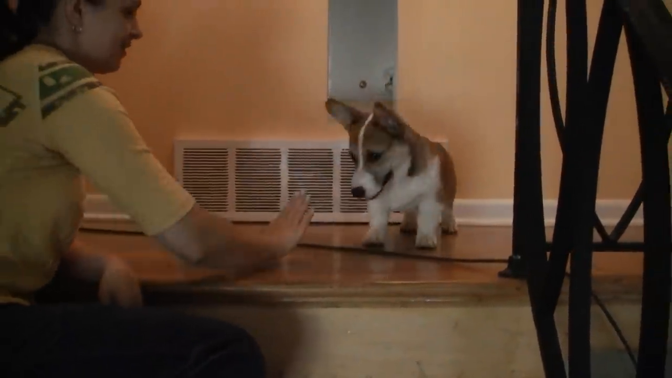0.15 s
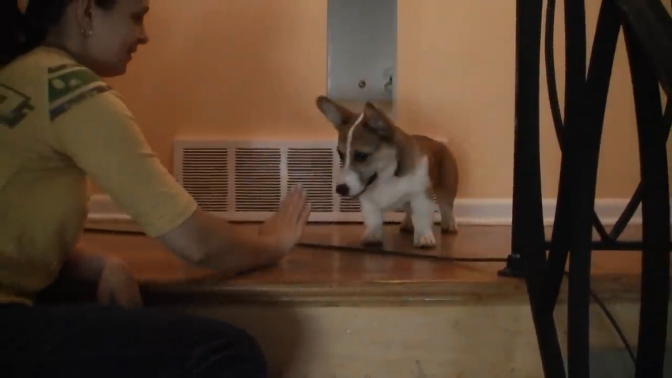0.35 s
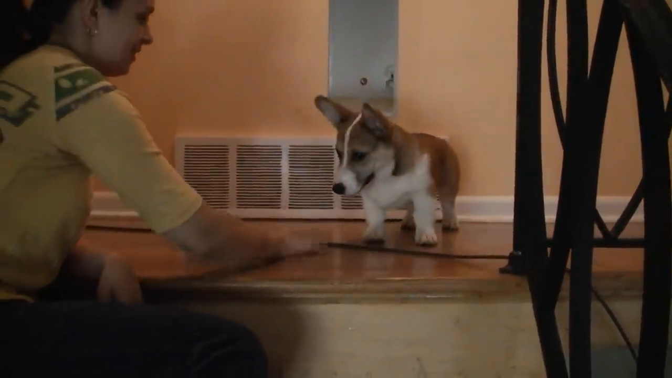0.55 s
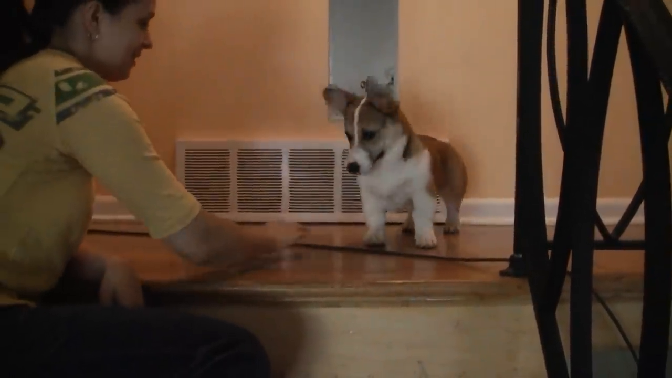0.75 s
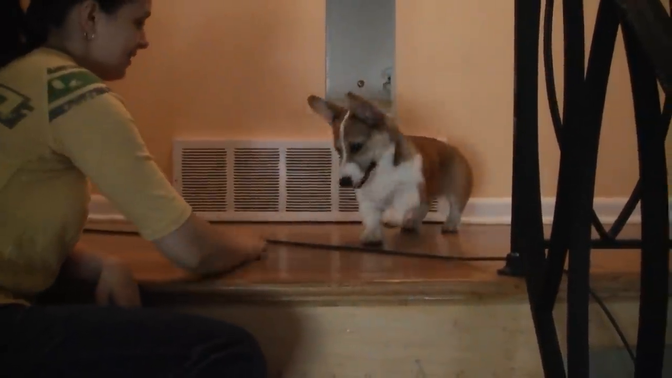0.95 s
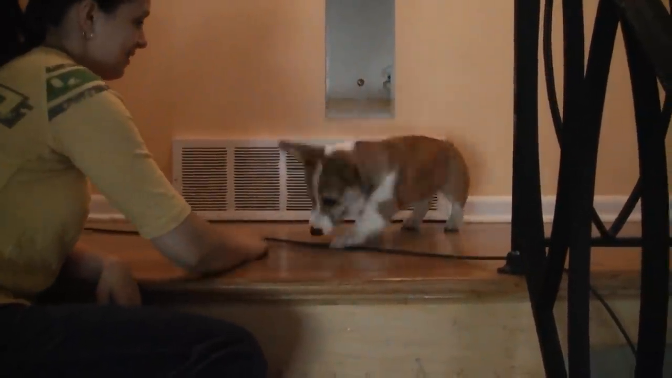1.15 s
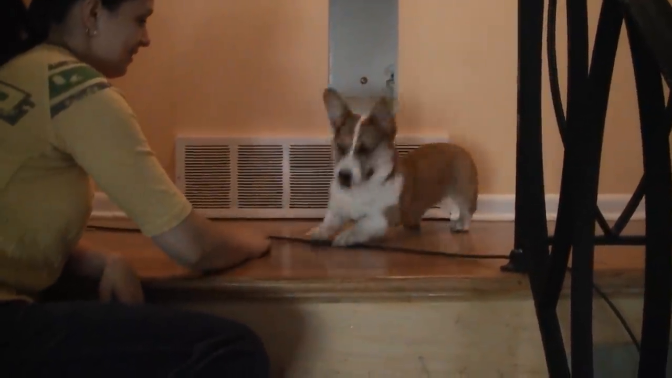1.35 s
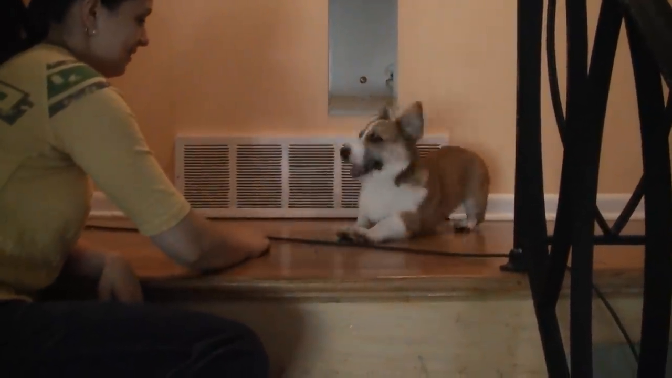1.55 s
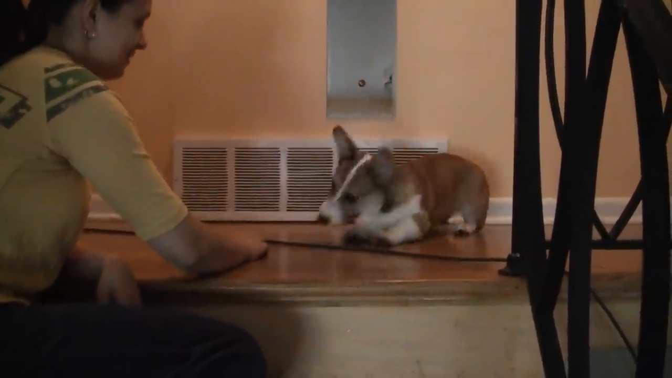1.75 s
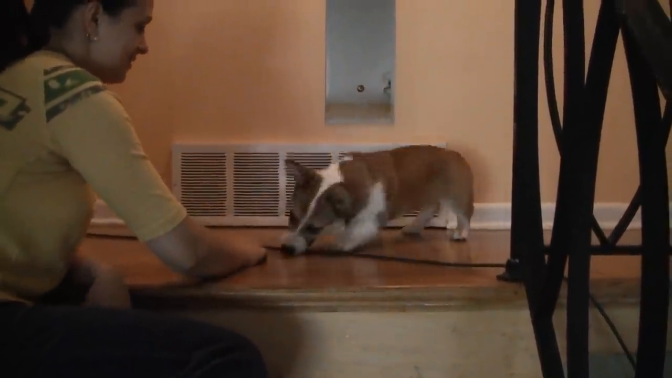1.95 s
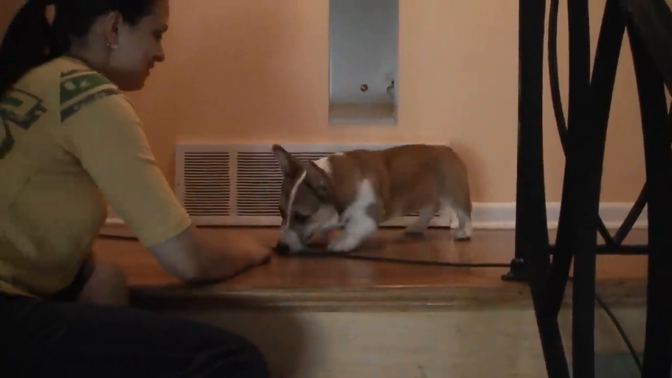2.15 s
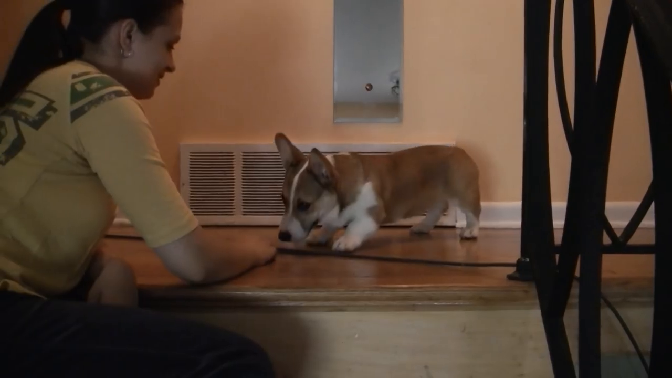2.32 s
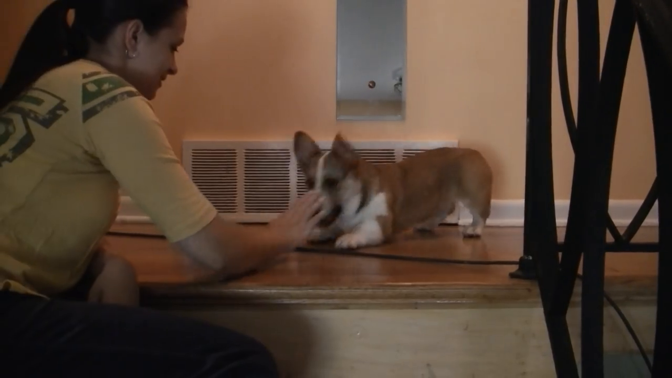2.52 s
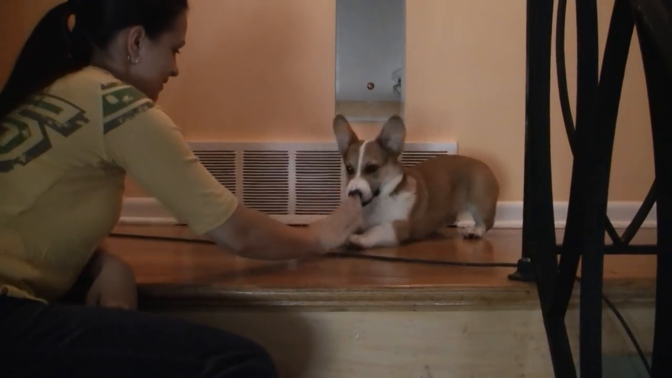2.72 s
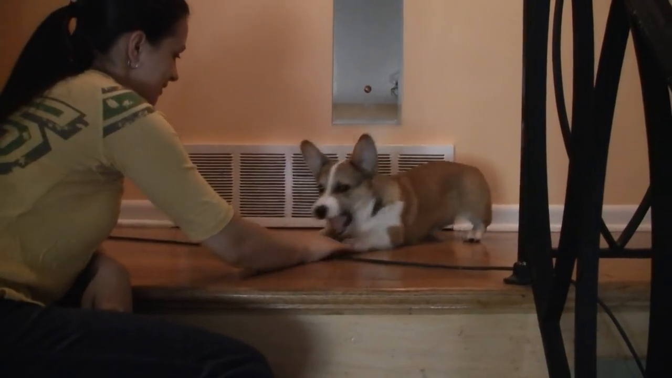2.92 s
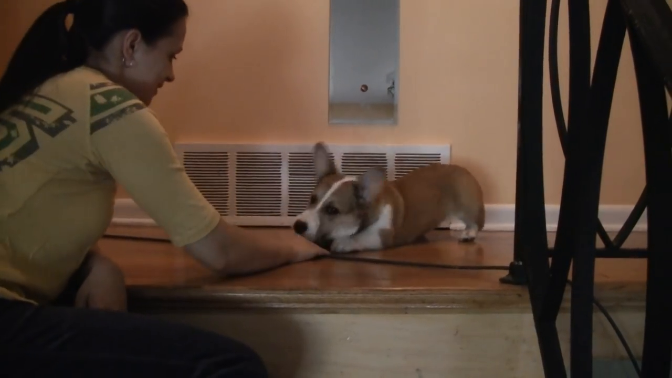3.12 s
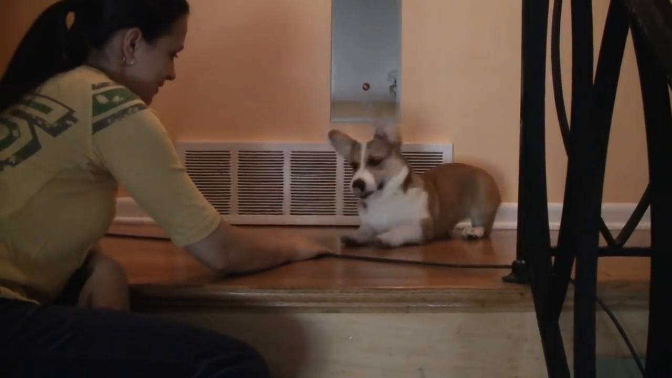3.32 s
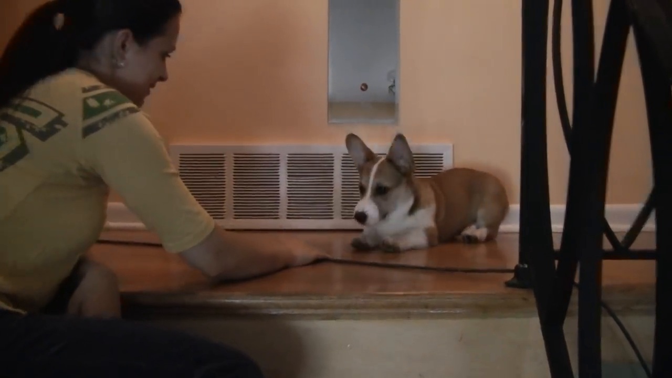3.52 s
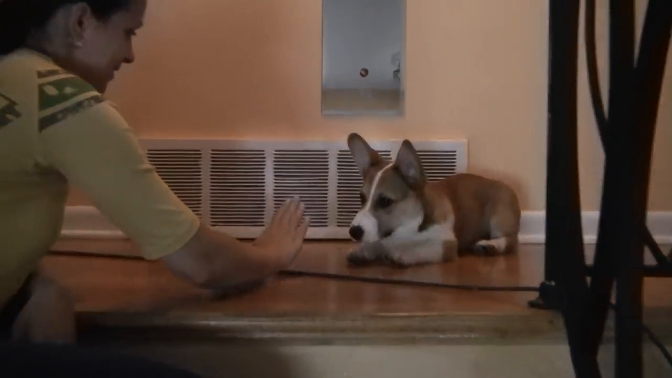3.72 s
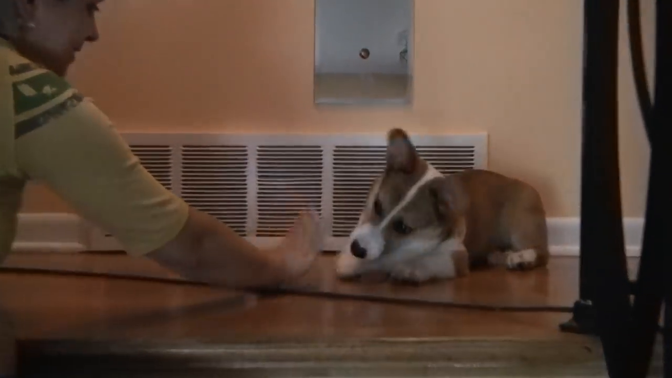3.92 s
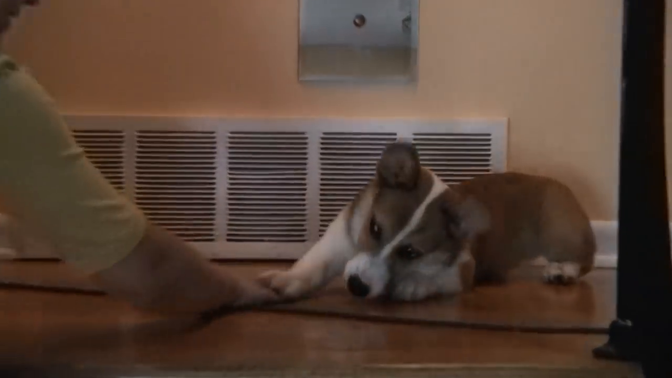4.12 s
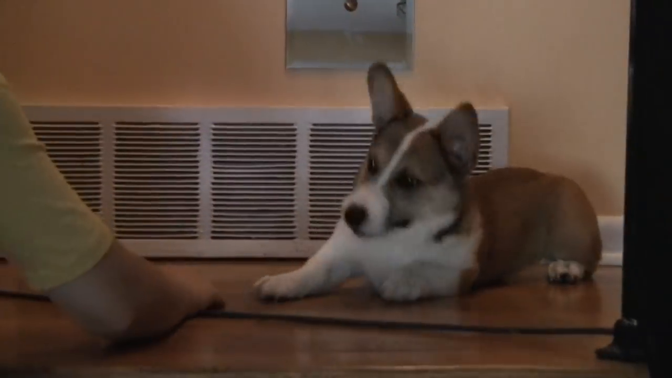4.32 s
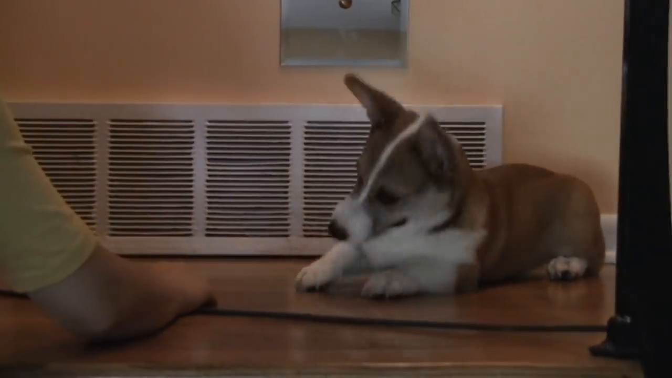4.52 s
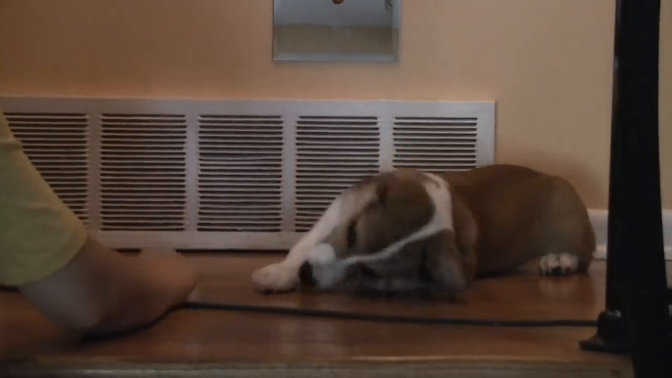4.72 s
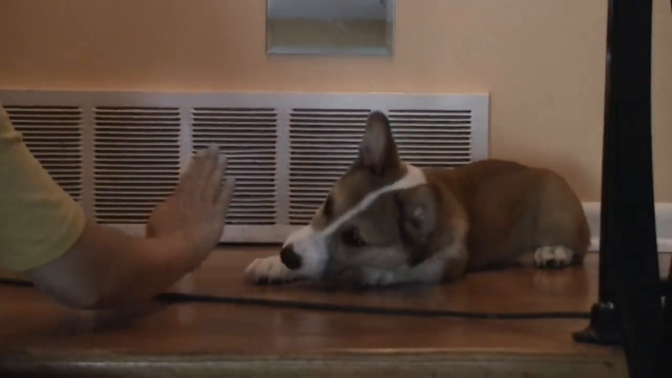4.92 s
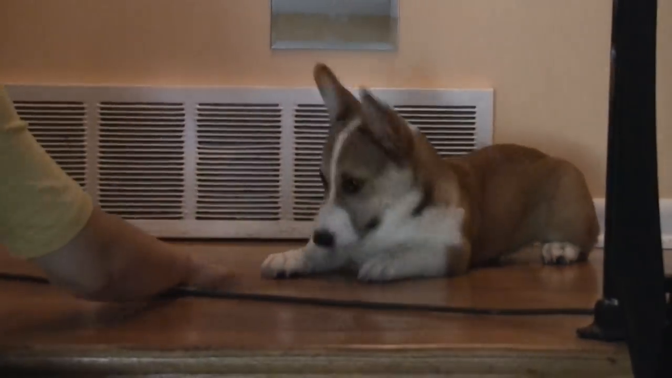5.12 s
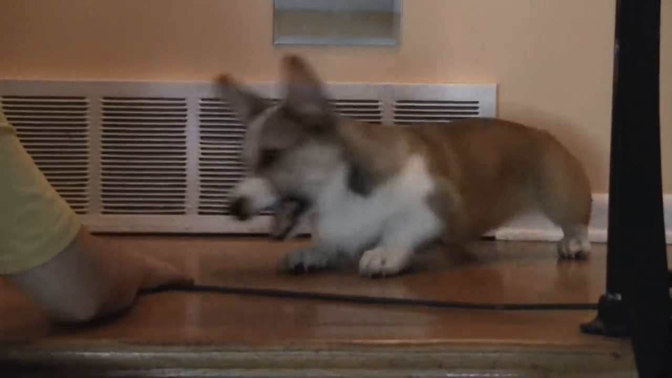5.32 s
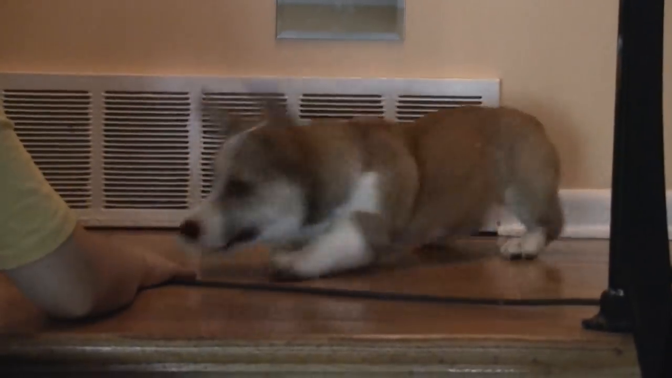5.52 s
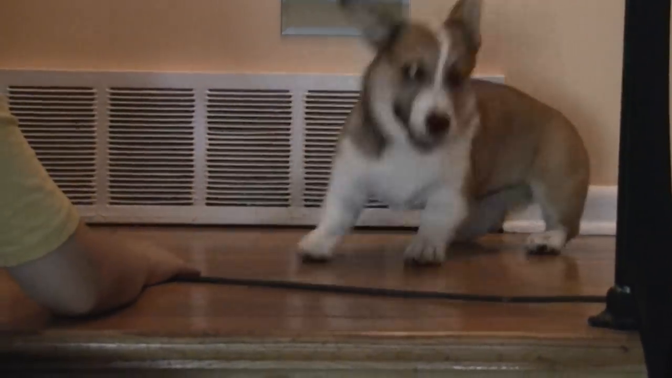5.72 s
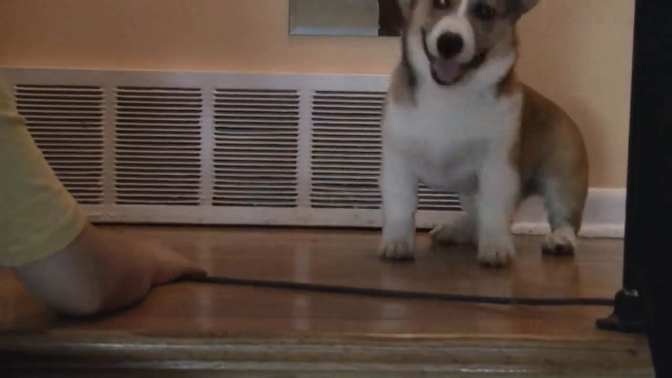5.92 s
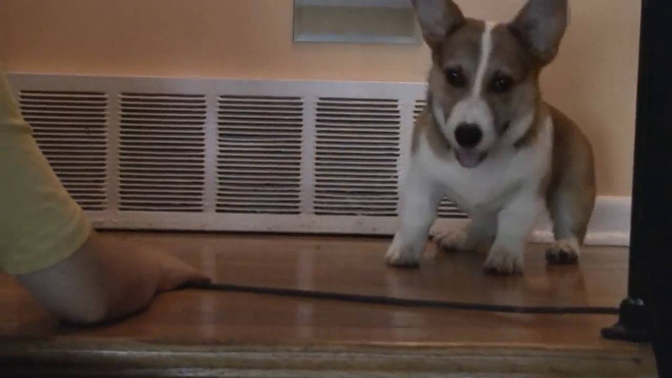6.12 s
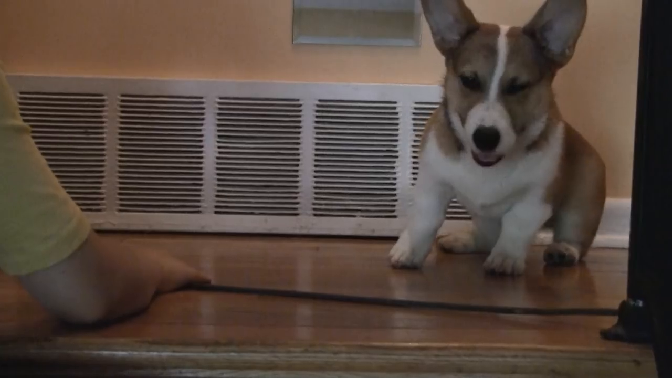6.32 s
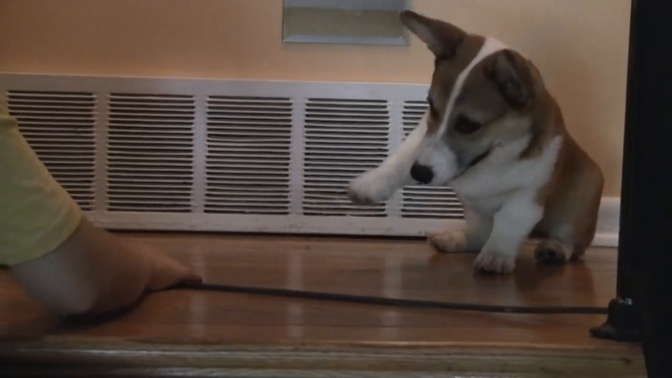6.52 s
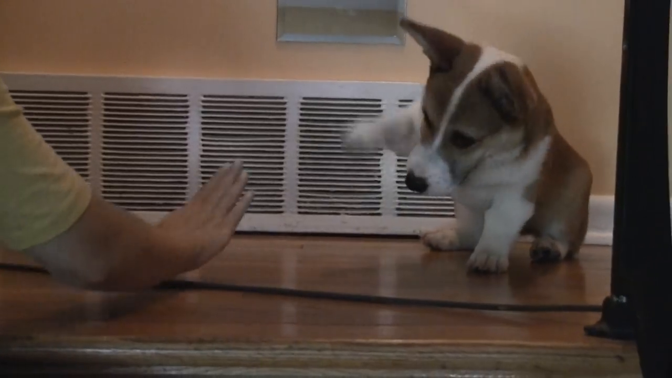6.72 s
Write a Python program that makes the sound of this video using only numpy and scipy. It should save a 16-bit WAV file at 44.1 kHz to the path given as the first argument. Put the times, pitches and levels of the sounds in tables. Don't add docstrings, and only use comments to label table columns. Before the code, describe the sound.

Faint vent drone and hiss in a live indoor stairwell, stereo microphones some metres off. A palm pats hollow boards, then a puppy pounces with clustered thuds, fur and pads sliding, claws clicking and a short rubbery skid. It snorts softly between moves. Further slaps come singly, one sharp and hard, the others duller, and a final scrabble with booming paws and a strong huff gives way to small ticks.

```python
import sys
import numpy as np
from scipy import signal
from scipy.fft import rfft, irfft, next_fast_len
from scipy.io import wavfile
from scipy.ndimage import uniform_filter1d

SR = 44100
rng = np.random.default_rng(int(sys.argv[2]) if len(sys.argv) > 2 else 0)


def pcm_store(signal):
    levels = np.round(np.clip(np.atleast_2d(signal), -1, 1) * 32767)
    wavfile.write(sys.argv[1], SR, levels.astype(np.int16).T)


def natural_amplitude(level_db):
    exponent = np.asarray(level_db, float) / 20
    return 10 ** exponent


N = 302526

# start in seconds, smack peak in dB, thud in dB, snap in dB,
# pitch of the air trapped under the palm in Hz.
PALMS = [
    (0.553, -37, 0.5, -9, 770),
    (2.758, -37, 5, -22, 1160),
    (3.948, -31, 6, 2, 1320),
    (4.9948, -34, 1, -30, 1420),
]


def unit(x):
    return x / np.sqrt(np.mean(x ** 2) + 1e-20)


def along(points, hz):
    f, v = np.transpose(points)
    return np.interp(np.log(hz + 1), np.log(f + 1), v)


def filtered(x, response):
    m = next_fast_len(x.shape[-1] + 8192)
    spectrum = rfft(x, m) * response(np.fft.rfftfreq(m, 1 / SR))
    return irfft(spectrum, m)[..., :x.shape[-1]]


def causal(points):
    def response(hz):
        gain = natural_amplitude(along(points, hz))
        cepstrum = irfft(np.log(gain / np.sqrt(np.mean(gain ** 2))))
        half = len(cepstrum) // 2
        cepstrum[1:half] *= 2
        cepstrum[half + 1:] = 0
        return np.exp(rfft(cepstrum))
    return response


def resonant(modes):
    def response(f):
        h = 0
        for k, (hz, width_hz, db) in enumerate(modes):
            damping = 1j * f * width_hz
            h = h + (-1) ** k * natural_amplitude(db) * damping / (hz * hz - f * f + damping)
        return unit(np.abs(h)) * np.exp(1j * np.angle(h))
    return response


def add(track, s, x):
    part = track[..., round(s * SR):][..., :x.shape[-1]]
    part += x[..., :part.shape[-1]]


def push(length_s, grain_db):
    u = np.arange(SR // 4) / SR / np.clip(length_s, .0003, .08)
    grains = rng.standard_normal(len(u)) * natural_amplitude(grain_db * rng.exponential(size=len(u)))
    force = u * np.exp(-u) * grains
    return force / np.linalg.norm(force)


def taps(rows, width):
    out = np.zeros(N)
    for s, db, hz in rows:
        tap = .25 * push(.001, grain_db=1)[:SR // 50]
        tap[0] -= 1
        nail = resonant([(hz, width * hz, 0)])
        add(out, s, natural_amplitude(db + 8.5) * filtered(filtered(tap, nail), nail))
    return out


def sounded(force):
    # pitch in Hz, width in Hz, level in dB.
    boards = [(124.4, 6.6, -8.5), (176.7, 26.2, 1.5), (302, 63, -2), (413, 43.7, 0), (544, 51, -11.5),
              (670, 17, -44), (830, 33, -11)]
    # frequency in Hz, level in dB.
    crack = [(1500, -14), (2400, 3), (3500, -0.5), (4800, 1.5), (6500, -41)]
    # frequency in Hz, level in dB.
    snap = [(3500, -0.5), (5200, -0.5), (7500, -3), (9000, -7.5), (11000, -15), (15500, -16)]
    bodies = [resonant(boards), causal(crack), causal(snap)]
    return sum(filtered(f, body) for f, body in zip(force, bodies))


def air():
    # frequency in Hz, density in dB per Hz.
    density = [(20, -22), (60, -18), (102, -3.5), (137, -10.5), (200, -3), (260, -4.5), (420, -2),
               (520, -4), (660, -6), (1000, -11), (1500, -15), (2700, -21), (6000, -26.5), (16000, -32)]
    # frequency in Hz, side under mid in dB.
    side_under_mid = [(60, -4), (110, -11), (200, 0), (380, -0.5), (700, -1), (1290, -0.5), (2380, -1.5),
                      (4400, -1), (8120, -1), (15000, 0)]
    # time in seconds, level in dB.
    level_db = [(0, -65), (1, -65), (3.5, -64), (6, -65), (6.86, -66)]
    z = signal.stft(rng.standard_normal((2, N)), nperseg=512)[2]
    field = uniform_filter1d(rng.standard_normal(z.shape[1:]), size=5, axis=0)
    field = uniform_filter1d(field, size=14, axis=1)
    pair = signal.istft(z * natural_amplitude(1 * unit(field)), nperseg=512)[1][:, :N]
    mid, side = filtered(pair, lambda hz: natural_amplitude(along(density, hz) + [0 * hz, along(side_under_mid, hz)]))
    level = natural_amplitude(np.interp(np.arange(N) / SR, *np.transpose(level_db)))
    return level * np.array([mid + side, mid - side]) / np.std(mid)


def stairwell(x, build_s):
    # frequency in Hz, t60 in seconds.
    decay = [(100, 0.22), (300, 0.56), (1000, 0.6), (2500, 0.58), (6000, 0.6), (12000, 0.34)]
    # frequency in Hz, side under mid in dB.
    side_under_mid = [(60, -38), (110, -15), (200, -25.5), (380, -13), (700, -13.5), (1290, -13.5),
                      (2380, -9), (4400, -3.5), (8120, -1), (15000, 7)]
    out, hop = np.zeros((2, N)), SR // 6
    window = np.hanning(2 * hop + 1)[:-1]
    padded = np.pad(x, (hop, 2 * hop))
    for start in range(0, N, hop):
        hz, t, z = signal.stft(rng.standard_normal((2, SR * 2 // 3)), SR, nperseg=256)
        z = z * natural_amplitude(-60 * t / along(decay, hz)[:, None])
        z = z * natural_amplitude([0 * hz, along(side_under_mid, hz)])[..., None]
        mid, side = signal.istft(z, SR, nperseg=256)[1]
        rise = 1 - np.exp(-np.arange(len(mid)) / SR / build_s)
        tail = rise * np.array([mid + side, mid - side]) / np.linalg.norm(mid)
        piece = window * padded[start:start + 2 * hop]
        wet = signal.fftconvolve(piece[None], tail, axes=1)
        add(out, max(start - hop, 0) / SR, wet[:, max(hop - start, 0):])
    return out


def booms():
    # start in seconds, boom in dB.
    weight = [(1.083, -51.5), (1.137, -67), (1.185, -59), (1.242, -47), (1.3, -53), (1.399, -48),
              (1.9, -58), (1.937, -53.5), (3.057, -54), (4.184, -58), (4.697, -53.5), (5.466, -46),
              (5.518, -65), (5.578, -45.5)]
    palm_boom_db, boom_hz, scatter = -9.5, 117.6, 0.046
    out, t = np.zeros(N), np.arange(SR // 4) / SR
    for s, db in weight + [(s, db + palm_boom_db) for s, db, *_ in PALMS]:
        hz = boom_hz * (1 + scatter * rng.standard_normal())
        envelope = natural_amplitude(db + 11.5 - 60 * t / 0.1) * (1 - np.exp(-t / 0.0028))
        add(out, s, envelope * np.sin(2 * np.pi * hz * t))
    return out


def huffs():
    # start in seconds, peak in dB, snout pitch in Hz, upper bands in dB, flutter from 0 to 1.
    breaths = [(0.072, -58, 1340, -31, 0.2), (.918, -54.5, 1950, -8.5, 0), (1.042, -51, 1730, -22, 0.08),
               (1.155, -46, 1850, 23, 0.5), (1.539, -39.5, 1720, -4, 0.01), (2.006, -42, 1570, -1, 0.2),
               (2.577, -54.5, 1600, -3, 0.3), (3.018, -44, 1200, -10.5, 0.1), (4.359, -49, 1500, -5, 0.11),
               (5.354, -50.5, 1420, 9, 0.1), (5.609, -36, 1900, -5.5, 0.2)]
    plain_s, flutter_s = 0.0083, 0.023
    out, t = np.zeros(N), np.arange(SR // 4) / SR
    nostrils = resonant([(6700, 4700, 0)])
    for s, db, hz, upper_db, flutter in breaths:
        length_s = plain_s + flutter_s * flutter
        snout = resonant([(hz, 330, 0), (1.174 * hz, 400, upper_db / 2 + 6.5), (1.275 * hz, 1200, upper_db)])
        cycles = 250 * t + np.cumsum(rng.normal(0, .012, len(t)))
        puffs = -np.diff(np.floor(cycles), prepend=0) * natural_amplitude(17.0 * rng.standard_normal(len(t)))
        puffs = puffs * t * np.exp(-t / length_s)
        share = np.clip(flutter, 0, 1)
        hiss = np.sqrt(1 - share) * push(length_s, grain_db=-2)
        flow = hiss + np.sqrt(share) * puffs / np.linalg.norm(puffs)

        def skirts(f):
            low_cut = (1j * f / (.7 * hz + 1j * f)) ** 3
            return low_cut / (1 + 1.1j * f / (2.2 * hz) - (f / (2.2 * hz)) ** 2) ** 2

        voiced = filtered(filtered(flow, snout), skirts)
        breath = filtered(filtered(hiss, nostrils), nostrils)
        add(out, s, natural_amplitude(db + 23.5) * (voiced + natural_amplitude(upper_db / 2 - 22) * breath))
    return out


def claws():
    # start in seconds, peak
    # in dB, centre in Hz.
    tips = [(1.084, -50, 7000), (1.143, -41, 3460), (1.171, -48, 8500), (1.253, -36.5, 6450),
            (1.832, -55.5, 2580), (1.943, -56, 7300), (1.953, -47, 7350), (2.758, -47.5, 7500),
            (3.421, -50.5, 2080), (3.952, -30.5, 1640), (4.7028, -36.5, 7240), (4.9942, -30.5, 4120),
            (4.9942, -42.5, 6400), (4.995, -35, 2020), (5.186, -65, 6000), (5.230, -46, 2730),
            (5.301, -50, 6900), (5.345, -36.5, 1750), (5.453, -46, 7250), (5.916, -43.5, 3000),
            (6.466, -52.5, 8550)]
    # start in seconds, peak in dB, centre in Hz.
    flats = [(.051, -50, 4400), (.5527, -49, 4000), (1.117, -38.5, 5900), (1.365, -46, 7000),
             (2.940, -40, 5100), (3.948, -28.5, 4200), (4.415, -49.5, 6450), (4.490, -44, 6050),
             (4.716, -36.5, 6000), (5.487, -33.5, 6000), (5.888, -47.5, 5900), (6.468, -57, 1480)]
    return taps(tips, width=0.53) + taps(flats, width=1.14)


def skid(count):
    start_s, gap_s, gap_grows_s = 1.1585, .0039, 0.00015
    peak_db, fade_db, hardest_slip = -32.5, 1.5, 2.5
    pitch_hz, rise_hz = 1950, 50
    k, chance = np.arange(count), rng.standard_normal((count, 2))
    s = start_s + gap_s * k + gap_grows_s * k ** 2 + 0.00054 * chance[:, 0]
    db = peak_db - fade_db * np.abs(k - hardest_slip) + 1 * chance[:, 1]
    slips = taps(zip(s, db, pitch_hz + rise_hz * k), width=0.99)
    return filtered(slips, lambda hz: 1 / (1 + 1.2j * hz / 4300 - (hz / 4300) ** 2) ** 2)


def slides():
    # start in seconds, rub peak in dB, thud in dB, grit in dB.
    pads = [(0.699, -51, -20, -1), (1.212, -33, -1, -11), (1.252, -30, 3, -2), (1.294, -29.5, 0, -9.5),
            (1.455, -35.5, -1, -6.5), (1.893, -37.5, -7.5, -8), (2.078, -43, -5.5, -9),
            (2.149, -60, 8, -25), (3.948, -29.5, 1, -4.5), (3.999, -32.5, 3, -8), (4.496, -47.5, -1.5, 6),
            (5.004, -32, 2, -41)]
    # start in seconds, rub peak in dB, thud in dB, grit in dB.
    furs = [(0.572, -41.5, 3.5, -4.5), (0.908, -63.5, -20, 10), (1.34, -28.5, -4.5, -13),
            (1.399, -33.5, -0.5, -11), (1.498, -39, -0.5, -19), (1.935, -38.5, -5, -2),
            (2.757, -30, 1.5, -10), (2.942, -45, -8.5, 3), (3.034, -31, -7, -23), (3.073, -40, 4.5, -15),
            (3.108, -47, 3, -9), (3.307, -52.5, -13, -1), (4.117, -37, 0, -3.5), (4.579, -63, 6.5, -13.5),
            (5.23, -47.5, -1, -4.5), (5.427, -38, 1, 0), (5.506, -29, 2.5, -6.5), (5.67, -43, -21, -13),
            (5.886, -53, -4, 9), (5.925, -51.5, -17, 3.5)]
    # start in seconds, rub peak in dB, thud in dB, grit in dB.
    drags = [(1.085, -35.5, 4.5, -8), (1.15, -45.5, 15, -8), (4.425, -50.5, -5.5, 7.5),
             (3.211, -52, -15, -1.5), (4.198, -43.5, 6, -3.5), (4.249, -45, -1, -8),
             (4.692, -38.5, -2.5, 0), (5.273, -40, -8.5, -2.5), (5.31, -40, -18, -11),
             (5.548, -28.5, 0, -9.5)]
    # frequency in Hz, level in dB.
    rub_colour = [(300, -11), (600, 4), (900, 6.5), (1300, 2.5), (1600, 1.5), (1950, -4.5), (2200, -10.5),
                  (4000, -36.5)]
    # length in seconds, pad grit in dB, fur grit in dB
    kinds = [(pads, (0.013, 0.1, -3)), (furs, (.014, -10, 0.077)), (drags, (0.028, -1.2, 0.1))]
    contacts = [row + kind for rows, kind in kinds for row in rows]
    force = np.zeros((4, N))
    for s, db, thud_db, grit_db, length_s, pad_db, fur_db in contacts:
        rub = np.array([push(length_s, grain_db=3) for _ in force])
        levels_db = [[thud_db + 19], [grit_db + pad_db + 9.5], [grit_db + fur_db + 13], [14]]
        add(force, s, natural_amplitude(db + np.array(levels_db)) * rub)
    return sounded(force) + filtered(force[3], causal(rub_colour))


def heels():
    # start in seconds, peak in dB, centre in Hz.
    knocks = [
        (.555, -35.5, 834),
        (2.761, -40.5, 564),
        (3.951, -30, 404),
        (4.996, -32, 600),
    ]
    return taps(knocks, width=0.5)


def blows():
    # start in seconds, smack peak in dB, thud in dB, snap in dB,
    # pitch of the air trapped under the pad in Hz.
    paws = [(1.081, -45, 5, 1, 495), (1.142, -46, 13, -40, 1450), (1.183, -35.5, 3.5, -40, 1030),
            (4.184, -44, 7.5, -30, 830), (4.7014, -43.5, 2, 3, 910), (5.345, -41.5, -3, -30, 970),
            (5.467, -35, -5, -16, 730), (5.487, -33, 4, -2, 824)]
    crack_grows, crack_base_db = 4.8, -4.5
    force, smack = np.zeros((3, N)), np.zeros(N)
    for s, db, thud_db, snap_db, hz in PALMS + paws:
        crack_db = crack_base_db + crack_grows * snap_db
        weight = np.abs(push(0.00029, grain_db=8.0)) + 0.5 * push(0.0029, grain_db=-26)
        add(force[0], s - .002, natural_amplitude(db + thud_db + 11.0) * weight)
        skin = np.array([push(.005, grain_db=1), push(.004, grain_db=1)])
        add(force[1:], s - .001, natural_amplitude(db + np.array([[crack_db + 10.5], [snap_db + 10.5]])) * skin)
        cup = resonant([(hz, 0.83 * hz, 0)])
        squeezed = filtered(filtered(push(0.0029, grain_db=2.5), cup), cup)
        add(smack, s - .002, natural_amplitude(db + 12.5) * squeezed)
    return sounded(force) + smack


def scene():
    # delay in seconds, level in dB.
    walls = [(.0035, -28.5), (0.0106, -11), (.017, -18.5)]
    # frequency in Hz, level in dB.
    wet = [(100, 7.5), (500, 5.5), (2000, 4.5), (5000, 0), (12000, 1.5)]
    # frequency in Hz, left over right in dB.
    lean = [(100, 0), (200, 1.5), (400, -1.5), (2400, -2), (4400, 0.5), (8000, -2.5), (12000, 0)]
    low_cut_hz = 75
    play = blows() + slides() + huffs() + skid(count=10) + heels()
    low, ticks = booms(), claws()

    def echoes(hz):
        return 1 + sum(natural_amplitude(db) * np.exp(-2j * np.pi * hz * s) for s, db in walls)

    def microphones(hz):
        return natural_amplitude(along(lean, hz) * [[.5], [-.5]]) * (1j * hz / (low_cut_hz + 1j * hz)) ** 4

    near = filtered(play + ticks, echoes)
    spread = play + natural_amplitude(-5) * ticks + natural_amplitude(-4.0) * low
    room = stairwell(filtered(spread, lambda hz: natural_amplitude(along(wet, hz))), build_s=0.0026)
    return filtered(near + low + room, microphones) + air()


def roll_off(x):
    return signal.sosfilt(signal.butter(12, 16640, fs=SR, output="sos"), x)


def record(dry):
    top_hz = 15830
    mix = filtered(dry, lambda hz: np.where(hz < top_hz, 1, natural_amplitude(-28)))
    return roll_off(mix)


dry = scene()
out = record(dry)
pcm_store(out)
```